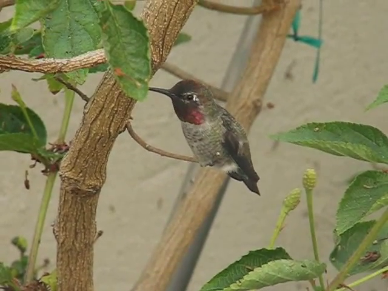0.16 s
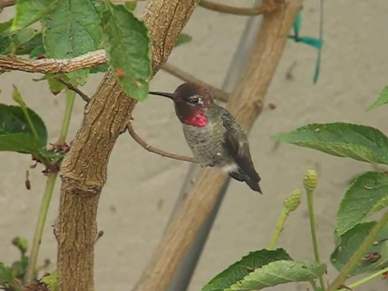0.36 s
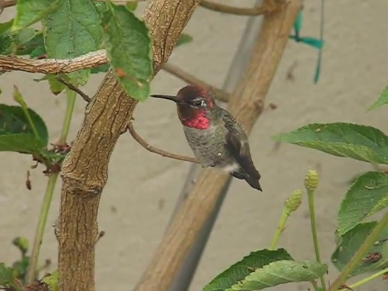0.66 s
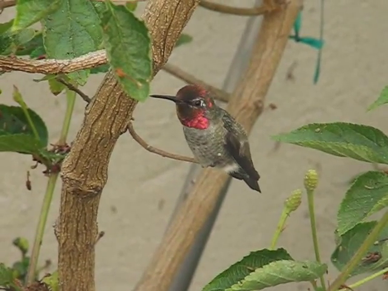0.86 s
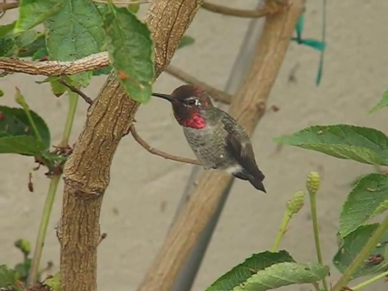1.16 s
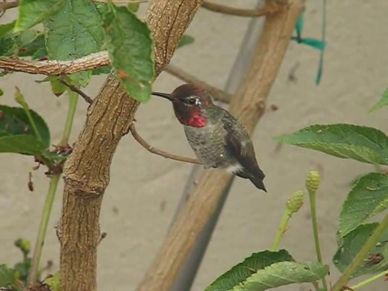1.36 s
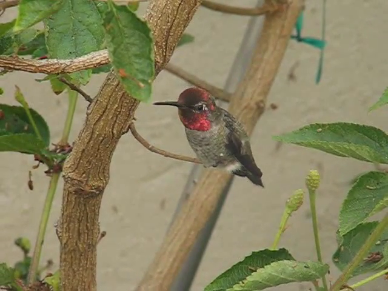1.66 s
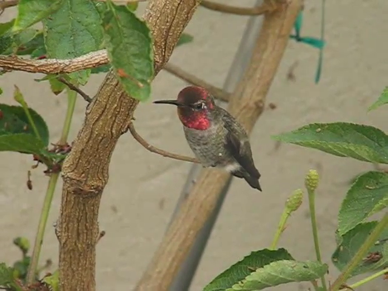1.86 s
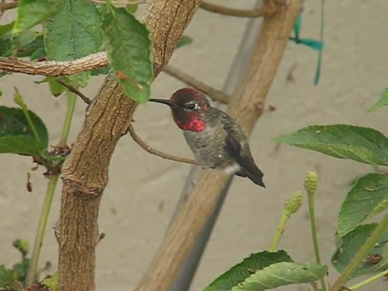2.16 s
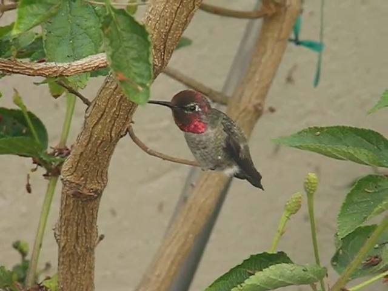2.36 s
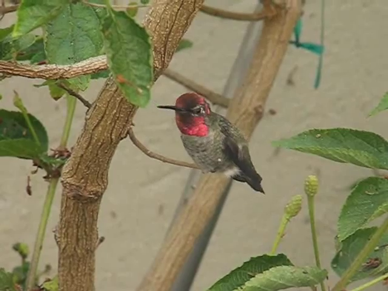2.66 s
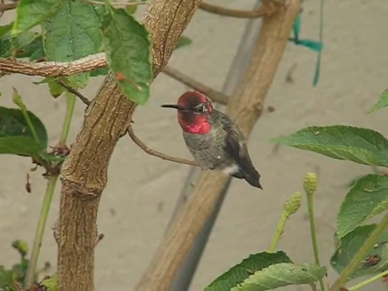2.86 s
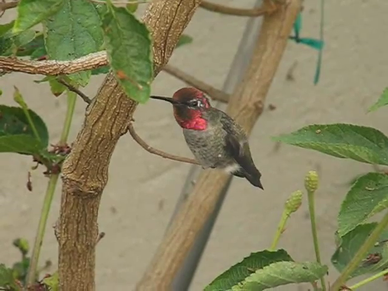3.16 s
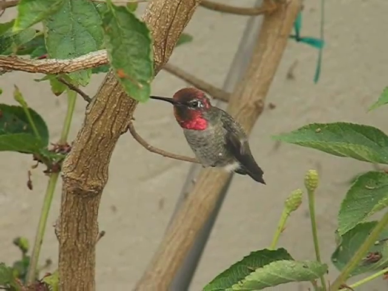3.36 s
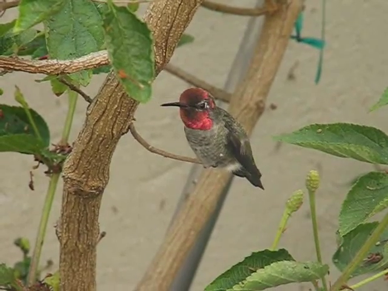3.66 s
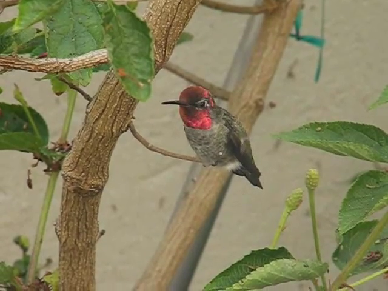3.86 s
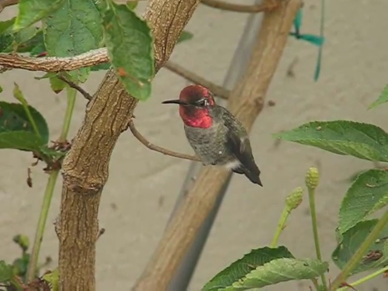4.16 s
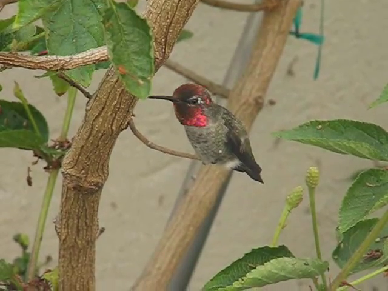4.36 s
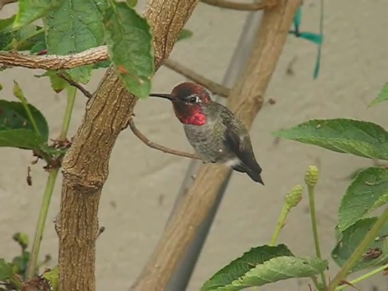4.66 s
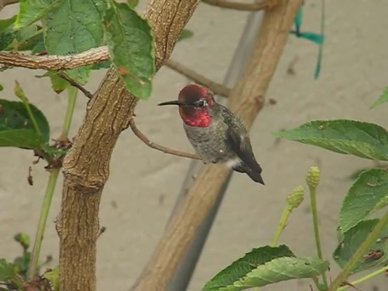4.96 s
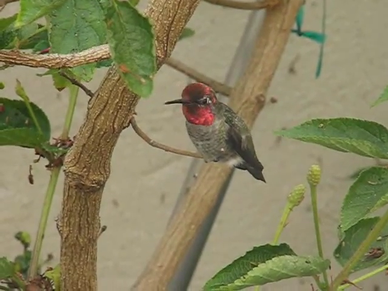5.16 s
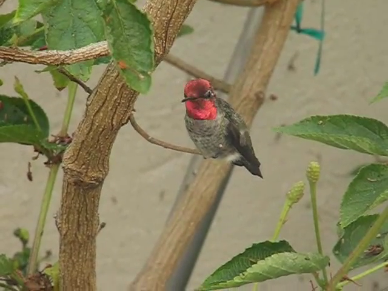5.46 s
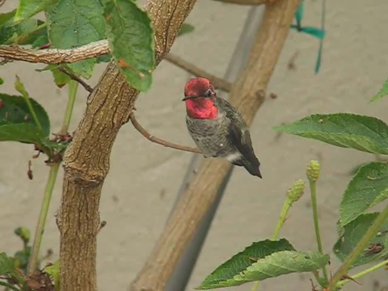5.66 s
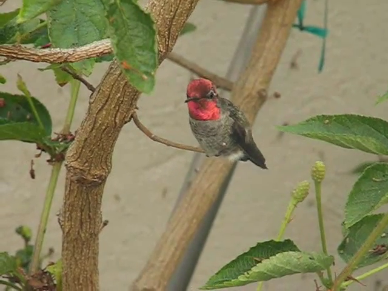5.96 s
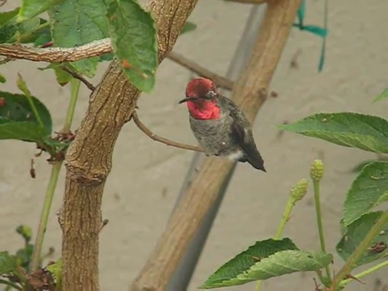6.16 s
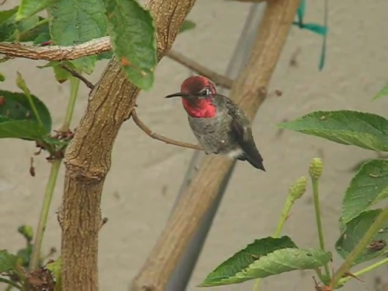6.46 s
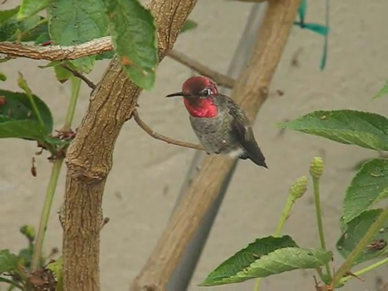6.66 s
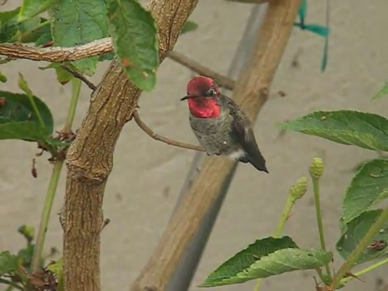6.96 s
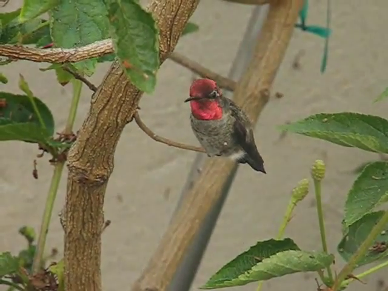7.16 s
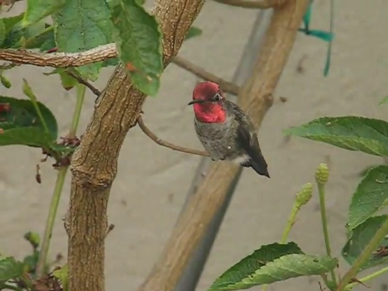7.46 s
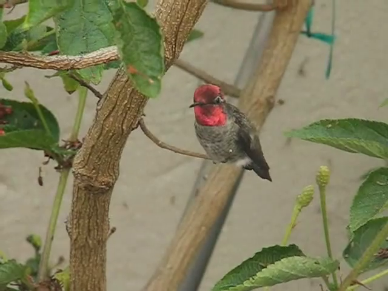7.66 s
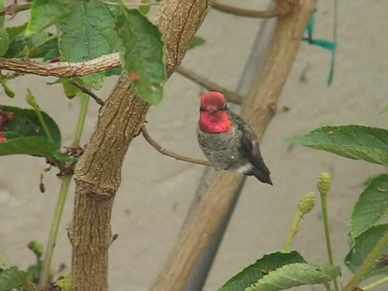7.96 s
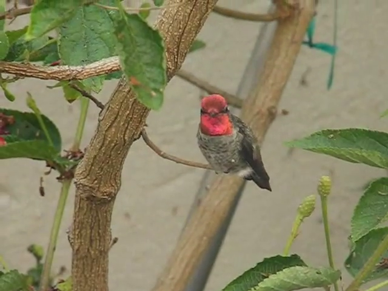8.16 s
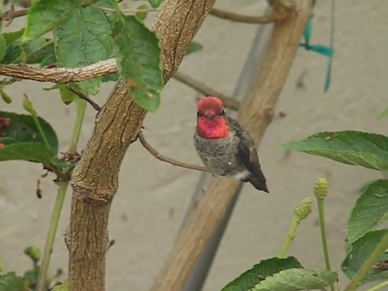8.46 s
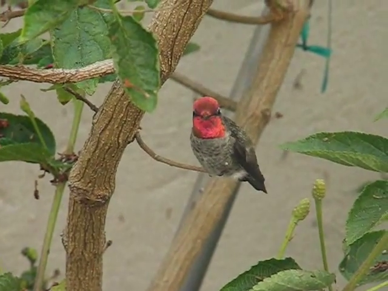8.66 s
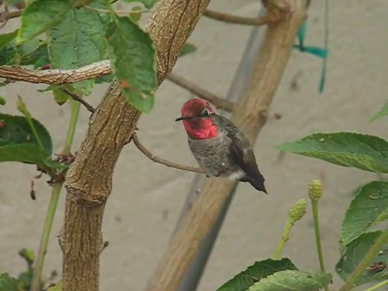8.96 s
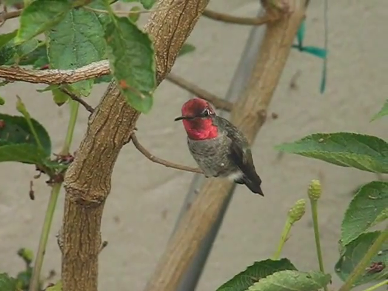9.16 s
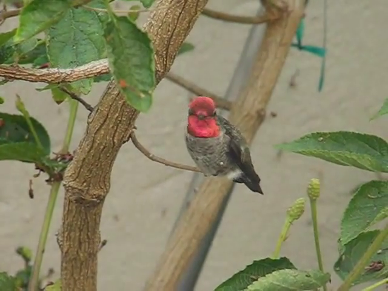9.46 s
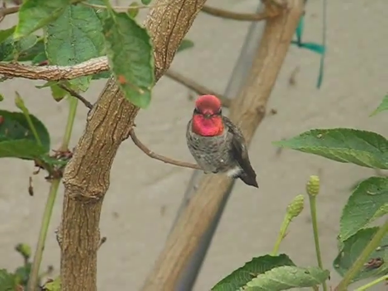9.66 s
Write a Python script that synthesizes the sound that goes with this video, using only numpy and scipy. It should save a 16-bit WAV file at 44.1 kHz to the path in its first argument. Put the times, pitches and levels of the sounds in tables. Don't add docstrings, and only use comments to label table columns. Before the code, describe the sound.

A hummingbird perched by a garden wall sings thin, very high, scratchy notes, buzzes and loud squeaks over a low distant traffic hum.

```python
import sys
import numpy as np
from scipy import signal
from scipy.fft import rfft, irfft, next_fast_len
from scipy.io import wavfile
from scipy.ndimage import uniform_filter1d, minimum_filter1d, map_coordinates

SR = 44100
rng = np.random.default_rng(int(sys.argv[2]) if len(sys.argv) > 2 else 0)


def inscribe(sig):
    pcm = np.round(np.clip(np.atleast_2d(sig).T, -1, 1) * 32767)
    wavfile.write(sys.argv[1], SR, pcm.astype(np.int16))


def magnitude_from_level(level_db):
    exponent = np.asarray(level_db, float) / 20
    return 10 ** exponent


N = 432180


def unit(x):
    return x / np.sqrt(np.mean(np.abs(x) ** 2) + 1e-20)


def along(points, hz):
    point_hz, value = np.transpose(points)
    return np.interp(np.log(hz + 1), np.log(point_hz + 1), value)


def wobble(rate, size):
    knots = rng.standard_normal(int(size * rate / SR) + 4)
    return map_coordinates(knots, [np.arange(size) * rate / SR])


def filtered(x, response):
    m = next_fast_len(N + SR // 2)
    return irfft(rfft(x, m) * response(np.fft.rfftfreq(m, 1 / SR)), m)[..., :N]


def add(track, s, hz, gain):
    part = track[round(s * SR):][:len(hz)]
    phase = 2 * np.pi * (np.cumsum(hz) / SR + rng.random())
    part += (gain * np.exp(1j * phase))[:len(part)]


def voiced(track, overtones_db):
    local_level = np.sqrt(np.abs(uniform_filter1d(np.abs(track) ** 2, 40)) + 1e-12)
    turn = track / local_level
    return sum(magnitude_from_level(db) * (track * turn ** k).real for k, db in enumerate(overtones_db))


RENDITIONS = {"open": [(3.756, .99, 1.005, .5, 2), (7.638, 1.01, .995, .5, -2)],
              "whistle": [(.343, .95, .99, -.5, .5), (4.064, 1.01, 1.005, .5, .5),
              (7.955, 1.002, 1.005, .5, -1.5)], "answer": [(.716, .97, 1.02, 1, .5),
              (4.455, 1.01, 1.01, -1.5, .5), (8.345, .99, .97, -.5, -.5)],
              "close": [(.040, 1.01, 1.01, -2.5, .5), (1.048, 1.01, .995, -.5, .5),
              (4.796, 1.005, .995, -.5, -1), (8.685, .99, 1.01, .5, .5)],
              "reed": [(1.675, 1.01, 1.005, -.5, -.5), (5.412, .98, 1.005, .5, -1),
              (9.318, 1.03, .98, .5, 1.5)], "bray": [(2.068, 1.005, .998, .2, 2),
              (5.824, .995, .995, -.5, -2), (9.712, .99, 1.01, 1, .5)],
              "duet": [(2.560, 1.015, 1.002, .2, .5), (6.352, 1.002, 1.002, .5, .5)],
              "encore": [(3.100, .99, .995, -1.5, -.5), (7.018, .997, .995, .5, .2)]}


def sung(table):
    once = (0, 1, 1, 0, 0)
    pairs = []
    for names, rows in table.items():
        for name in names.split():
            for time in RENDITIONS.get(name, [once]):
                pairs += [(row, time) for row in rows if time[0] + row[0] * time[1] >= 0]
    return pairs


def sung_notes(table):
    return [(s + after * pace, length * pace, from_hz * pitch, to_hz * pitch, db + note_db)
            for (after, length, from_hz, to_hz, db), (s, pace, pitch, note_db, _) in sung(table)]


def sung_buzzes(table):
    return [(s + after * pace, length * pace, mid_hz * pitch, start_db + buzz_db, end_db + buzz_db)
            for (after, length, mid_hz, start_db, end_db), (s, pace, pitch, _, buzz_db) in sung(table)]


def notes(rows, overtones_db, bend, waver, flutter_db, edge,
          arch=0., swell_db=0., throb=0., throb_hz=50, dive=0.):
    track = np.zeros(N, complex)
    for s, length, from_hz, to_hz, db in rows:
        size = round(length * SR)
        u = np.arange(size) / size
        cycle = np.cumsum(throb_hz * np.exp(0.058 * wobble(44.5, size))) / SR % 1
        settled = (1 - np.exp(-bend * u)) / (1 - np.exp(-bend))
        hz = from_hz + (to_hz - from_hz) * settled
        hz = hz * (1 + arch * np.sin(np.pi * u) + dive * np.exp(-7 * cycle))
        hz = hz * (1 + waver * (wobble(300, size) + 1.1 * wobble(1800, size)))
        beat = 1 - np.clip(throb, 0, 1) * np.cos(np.pi * cycle ** 0.5) ** 2
        shape = np.sin(np.pi / 2 * np.clip(np.minimum(u, 1 - u) / edge, 0, 1)) ** 2
        level_db = db + swell_db * (u - 1) + flutter_db * wobble(265.7, size)
        add(track, s, hz, magnitude_from_level(level_db) * shape * beat)
    return voiced(track, overtones_db)


def puffs(rows, overtones_db, rate_hz, uneven, span, waver, gate, rise):
    track = np.zeros(N, complex)
    for s, length, mid_hz, start_db, end_db in rows:
        size = round(length * SR)
        u = np.arange(size) / size
        cycle = np.cumsum(rate_hz * np.exp(uneven * wobble(rate_hz, size))) / SR % 1
        hz = mid_hz * np.exp(span * (.5 - cycle) + waver * wobble(1500, size))
        puff = np.sin(np.pi * cycle) ** gate * magnitude_from_level(2.8 * wobble(85.5, size))
        edge = np.clip(np.minimum(u * length / rise, (1 - u) * length / 0.016), 0, 1)
        add(track, s, hz, magnitude_from_level(start_db + (end_db - start_db) * u) * puff * edge)
    return voiced(track, overtones_db)


# start in seconds, length in seconds, from Hz, to Hz, level in dB.
WHISTLE_NOTES = [
    (.343, 0.042, 5274, 5610, -9.5),
    (.716, 0.045, 5250, 5530, -10),
    (4.064, 0.05, 5480, 5700, -11),
    (4.455, 0.038, 5270, 5380, -12.5),
    (7.955, 0.0364, 5150, 5610, -9),
    (8.345, 0.033, 5420, 5596, -9),
]
# level of the fundamental, then of each overtone, in dB.
WHISTLE_OVERTONES = [0, -8]


def whistles():
    return notes(WHISTLE_NOTES, WHISTLE_OVERTONES, bend=2.5, waver=.015, flutter_db=4, edge=.25,
                 arch=.04, swell_db=9)


GLIDE_NOTES = {"open": [(0, 0.0078, 5770, 7400, -24), (.004, 0.0098, 6600, 9400, -28),
               (.071, 0.017, 10700, 6250, -24.5), (.172, 0.0053, 11450, 10100, -28.5)],
               "whistle": [(.108, 0.0095, 7400, 9600, -33), (.117, 0.0051, 10900, 9900, -31)],
               "answer": [(.104, 0.0078, 7000, 9000, -41), (.112, 0.0033, 9700, 8950, -31.5)],
               "reed": [(-.148, .005, 5640, 3300, -43.5), (-.141, .004, 5200, 3830, -41)],
               "close": [(0, 0.0114, 6160, 7140, -24), (.004, 0.007, 6700, 8400, -28),
               (.072, 0.011, 8660, 6400, -23)], "free": [(.160, .008, 9600, 7800, -32),
               (.180, .007, 9800, 7750, -30), (.4595, .004, 7460, 5400, -30),
               (1.056, .012, 8200, 10500, -31.5), (1.170, .008, 10470, 7600, -27),
               (1.205, .0072, 10630, 8500, -25), (4.282, 0.0081, 11100, 6070, -23.5),
               (4.750, .0041, 10400, 9000, -25.5), (5.218, 0.0023, 11500, 10100, -24),
               (8.170, 0.0068, 10800, 5870, -28.5), (8.171, .004, 11000, 10200, -28),
               (3.751, .006, 7900, 7700, -24), (5.222, .006, 8450, 5700, -33),
               (5.688, .005, 5800, 3300, -37), (.550, .008, 9050, 5840, -31.5),
               (2.258, .006, 9500, 7700, -36), (1.749, .004, 5800, 4500, -36),
               (9.112, .004, 10500, 8450, -36)]}
# level of the fundamental, then of each overtone, in dB.
GLIDE_OVERTONES = [0, -4]


def glides():
    rows = sung_notes(GLIDE_NOTES)
    rising = [row for row in rows if row[2] < row[3]]
    falling = [row for row in rows if row[2] >= row[3]]
    up = notes(rising, GLIDE_OVERTONES, bend=1.2, waver=.009, flutter_db=1, edge=.03)
    return up + notes(falling, GLIDE_OVERTONES, bend=3, waver=.009, flutter_db=1, edge=.03)


TRILL_NOTES = {"open": [(.115, 0.095, 6540, 6860, -30.5), (.125, 0.089, 8140, 7800, -32.5)],
               "close": [(.100, 0.12, 6800, 6230, -31), (.117, 0.12, 8280, 7910, -30.5)],
               "reed": [(-.142, 0.064, 7520, 7800, -40), (-.024, 0.036, 7200, 7170, -36)]}
# level of the fundamental, then of each overtone, in dB.
TRILL_OVERTONES = [0, -3.5]


def trills():
    return notes(sung_notes(TRILL_NOTES), TRILL_OVERTONES, bend=.6, waver=.018, flutter_db=3, edge=.06,
                 throb=.9, throb_hz=56, dive=.06)


PURL_NOTES = {"duet": [(.309, .085, 4070, 3830, -43)], "free": [(2.255, .02, 4220, 4100, -38),
              (2.296, 0.049, 4280, 4530, -34.5), (2.334, .024, 4730, 4770, -25.5),
              (2.358, 0.11, 4540, 4270, -33.5), (6.01, 0.086, 4240, 4270, -34.5),
              (6.11, 0.12, 4430, 4467, -41.5)]}
# level of the fundamental, then of each overtone, in dB.
PURL_OVERTONES = [0, -6.5, -5]


def purls():
    return notes(sung_notes(PURL_NOTES), PURL_OVERTONES, bend=.6, waver=.015, flutter_db=4, edge=.03,
                 throb=.95, throb_hz=47, dive=.09)


DUET_NOTES = {"duet": [(0, 0.121, 4630, 4650, -37.5), (0, 0.12, 5050, 5420, -32.5),
              (.06, .06, 6000, 6050, -44)], "encore": [(0, 0.146, 4630, 4610, -37),
              (0, 0.11, 5050, 5430, -31.5), (.05, .06, 6050, 6150, -41)]}
# level of the fundamental, then of each overtone, in dB.
DUET_OVERTONES = [0, -3.5, -2]


def duets():
    return notes(sung_notes(DUET_NOTES), DUET_OVERTONES, bend=3.5, waver=.008, flutter_db=4.5, edge=.08,
                 arch=.015, swell_db=4, throb=.5, throb_hz=60)


SQUEAK_NOTES = {"bray": [(.004, .065, 9880, 9550, -31.5), (.168, 0.046, 9250, 9630, -26),
                (.168, .022, 9400, 10500, -22), (.192, 0.039, 10600, 10360, -26.5)]}


def squeaks():
    return notes(sung_notes(SQUEAK_NOTES), [0], bend=1.5, waver=.013, flutter_db=4, edge=.05, arch=.012)


# start in seconds, length in seconds, from Hz, to Hz, level in dB.
REED_NOTES = [
    (1.678, 0.087, 2070, 2177, -34.5),
    (5.412, 0.1, 1940, 2216, -37),
    (9.318, 0.087, 2067, 2145, -35.5),
]
# level of the fundamental, then of each overtone, in dB.
REED_OVERTONES = [-8, -17, -2.5, -12, -10.5, -6, -9.5]


def reeds():
    return notes(REED_NOTES, REED_OVERTONES, bend=3.2, waver=.014, flutter_db=4, edge=.06)


BRAY_NOTES = {"bray": [(0, 0.0703, 5950, 5865, -16.5), (.002, 0.0594, 3860, 3760, -28)]}
# level of the fundamental, then of each overtone, in dB.
BRAY_OVERTONES = [0, -9.5]


def brays():
    return notes(sung_notes(BRAY_NOTES), BRAY_OVERTONES, bend=3, waver=.02, flutter_db=3.5, edge=.18,
                 arch=.025, swell_db=6, throb=.35, throb_hz=300)


CHIP_NOTES = {"bray": [(.142, 0.015, 1800, 1740, -40.5)], "free": [(1.752, 0.023, 2300, 2500, -38.5),
              (5.39, 0.018, 2800, 2760, -42), (5.49, .025, 2300, 2400, -39),
              (4.875, 0.042, 1250, 1242, -35.5)]}


def chips():
    return notes(sung_notes(CHIP_NOTES), [0], bend=.6, waver=.03, flutter_db=2.5, edge=.3)


BUZZ_RUNS = {"open": [(-.087, 0.062, 6800, -42, -33), (.195, 0.13, 7360, -29, -33)],
             "whistle": [(-.008, 0.072, 6250, -28.5, -38), (.117, 0.018, 6300, -20, -27),
             (.266, .11, 6400, -29.5, -37.5)], "answer": [(-.01, 0.15, 6170, -27.5, -39),
             (.108, 0.023, 6300, -18, -34), (.183, .125, 6120, -36.5, -32)],
             "close": [(.112, .2, 6720, -38, -29)], "reed": [(-.213, 0.062, 6170, -39.5, -44),
             (-.1, 0.077, 5930, -32.5, -33.5), (-.035, .04, 5900, -36, -33)],
             "bray": [(-0.046, 0.048, 4700, -35, -27.5)], "duet encore": [(.123, 0.11, 6310, -29, -36)],
             "free": [(0, 0.062, 6840, -30, -46), (.515, 0.18, 6620, -32.5, -37),
             (1.45, 0.16, 6080, -35, -49), (1.870, 0.069, 6050, -38, -43), (1.968, 0.051, 4760, -36, -41),
             (5.585, .09, 6140, -55, -50), (9.49, 0.077, 6100, -44, -42), (6.243, 0.021, 5040, -30, -43.5)]}
# level of the fundamental, then of each overtone, in dB.
BUZZ_OVERTONES = [0, -4]


def buzzes():
    return puffs(sung_buzzes(BUZZ_RUNS), BUZZ_OVERTONES, rate_hz=340, uneven=.15, span=.62, waver=.07,
                 gate=1.1, rise=.006)


RASP_RUNS = {"bray": [(.007, 0.06, 5450, -40, -18.5), (.138, 0.031, 5400, -32.5, -35)],
             "reed": [(-.151, 0.028, 4000, -33.5, -48)], "duet encore": [(.222, .02, 5920, -20.5, -27),
             (.231, 0.065, 5610, -25.5, -17)], "free": [(1.60, 0.076, 3610, -37.5, -45),
             (3.672, .0354, 3620, -31, -45), (5.385, 0.024, 5470, -38, -36)]}
# level of the fundamental, then of each overtone, in dB.
RASP_OVERTONES = [0, -2.6, -1.9]
# frequency in Hz, gain in dB.
OPEN_THROAT = [(3700, -3), (5600, 1.5), (6900, 1.5), (8000, 6), (9000, 1.5), (10700, 4.5), (12400, -1),
               (14500, -5)]


def rasps():
    source = puffs(sung_buzzes(RASP_RUNS), RASP_OVERTONES, rate_hz=330, uneven=.4, span=.7, waver=.14,
                   gate=.4, rise=.001)
    return filtered(source, lambda hz: magnitude_from_level(along(OPEN_THROAT, hz)))


TICK_RUNS = {"open": [(-.150, -.150, -31, 3.5), (-.099, -.082, -32, 4), (-.047, -.038, -32.5, 8.5),
             (0, 0, -43, 1.5)], "whistle": [(.124, .124, -30, 6), (.187, .194, -29.5, 3),
             (.252, .252, -30, 2.5)], "answer": [(.119, .119, -36.5, 10)],
             "reed": [(-.186, -.158, -42, -5.5), (-.146, -.146, -38, -6)], "free": [(.8906, .918, -33, 7),
             (.9564, .9712, -37, 9), (1.0124, 1.0124, -37, 9), (1.767, 1.767, -36, 7),
             (1.9372, 1.9632, -36.5, 0), (4.6432, 4.6608, -33.5, 9.5), (4.698, 4.7254, -34, 8),
             (4.7602, 4.7602, -38, -3), (5.197, 5.197, -33, 0), (5.5144, 5.5144, -32, 4.5),
             (5.679, 5.7185, -34.5, 1), (5.7638, 5.8048, -32, -10), (2.339, 2.1, -47, -1),
             (8.1776, 8.1776, -36, -9), (8.542, 8.542, -42, 9.5), (8.5987, 8.608, -38, 11.5),
             (8.642, 8.65, -29.5, 8), (9.0854, 9.0932, -33, 2), (9.127, 9.157, -35, -7),
             (9.570, 10, -39, -1), (8.519, 8.533, -40, 2), (8.551, 8.551, -44, 4), (1.975, 1.993, -44, -4),
             (5.189, 5.189, -39, -4), (.584, 0.66, -35, 6), (9.408, 9.408, -30, 5.5),
             (9.592, 9.610, -38, -4), (9.632, 9.692, -40, -10)]}


def ticks():
    gap_s, scatter_db = .009, 0.5
    start_hz, log_fall, opens_per_db = 7800, 0.4254, 0.0227
    track, u = np.zeros(N + SR), np.arange(150) / 150
    each = []
    for (first, last, db, low_db), (s, pace, *_) in sung(TICK_RUNS):
        count = 1 + round(abs(last - first) / gap_s)
        each += [(at, db, low_db) for at in s + pace * np.linspace(first, last, count)]
    for (s, db, low_db), (pitch, phase, size) in zip(each, rng.standard_normal((len(each), 3))):
        opens = opens_per_db * max(low_db, -4)
        hz = start_hz * np.exp(.04 * pitch + opens - (log_fall + opens) * u)
        turn = 2 * np.pi * np.cumsum(hz) / SR + phase
        tick = np.sin(np.pi * u ** 1.05) * (np.cos(2 * turn) + magnitude_from_level(low_db - 2.5) * np.cos(turn))
        track[max(round(s * SR) - 55, 0):][:len(u)] += magnitude_from_level(db + 2.0 + scatter_db * size) * tick
    return track[:N]


def bird():
    tones = glides() + whistles() + trills() + purls() + duets() + squeaks() + reeds() + brays() + chips()
    return tones + buzzes() + rasps() + ticks()


# frequency in Hz, time to fall 60 dB in seconds.
YARD_DECAY = [(2200, 0.38), (5500, 0.3), (8000, 0.35), (11000, 0.29), (14000, 0.18)]
# delay in seconds, level in dB, left-right difference in dB.
WALL_ECHOES = [
    (.003, -7, 7),
    (.008, -11, -5.5),
    (0.016, -11, 6),
    (0.024, -22, 4),
]


def yard(x):
    hz, t, z = signal.stft(rng.standard_normal((2, SR * 3 // 4)), SR, nperseg=256)
    decay = magnitude_from_level(-60 * t / along(YARD_DECAY, hz)[:, None])
    shared, apart = signal.istft(z * decay, SR, nperseg=256)[1]
    tails = np.array([shared + .6 * apart, shared - .6 * apart]) / np.linalg.norm(shared)
    near = x
    for s, db, lean_db in WALL_ECHOES:
        echo = np.pad(x, (round(s * SR), 0))[:N]
        near = near + magnitude_from_level([[db + lean_db / 2], [db - lean_db / 2]]) * echo
    return near + magnitude_from_level(-4.5) * signal.fftconvolve(np.pad(x, (200, 0))[None], tails, axes=1)[:, :N]


# frequency in Hz, left-right difference in dB.
PORT_LEAN = [(1200, 12), (2200, -8.5), (3800, -2), (5500, 8.5), (7000, -1), (9000, -4), (12000, -1.5),
             (15000, -2)]
# frequency in Hz, radians by which the left leads.
PORT_LEAD = [(0, -0.17), (3620, -0.27), (5770, -1), (6720, -0.017), (15000, -0.1), (15200, -0.45)]


def at_ports(x):
    def ports(hz):
        return [magnitude_from_level(side * along(PORT_LEAN, hz) / 2) * np.exp(side * .5j * along(PORT_LEAD, hz))
                for side in (1, -1)]
    return filtered(x, ports)


# frequency in Hz, left-right likeness (0 to 1).
LIKENESS = [(60, 0.99), (180, 0.97), (550, 1), (1650, 0.77), (4970, 0.54), (15000, 1)]


def hum(spectrum, patchy_db):
    z = signal.stft(rng.standard_normal((2, N)), nperseg=512)[2]
    field = uniform_filter1d(uniform_filter1d(rng.standard_normal(z.shape[1:]), 6, 0), 14, 1)
    pair = signal.istft(z * magnitude_from_level(patchy_db * unit(field)), nperseg=512)[1][:, :N]

    def mid_side(hz):
        turn = np.arccos(np.clip(along(LIKENESS, hz), -1, 1)) / 2
        return magnitude_from_level(along(spectrum, hz)) * [np.cos(turn), np.sin(turn)]
    mid, side = filtered(pair, mid_side)
    return unit(np.array([mid + side, mid - side]))


# time in seconds, rumble level in dB.
TRAFFIC_SWELL = [(0, -29.5), (.35, -33.5), (.6, -36.5), (0.899, -31), (1.25, -29), (1.45, -36), (1.8, -38),
                 (2.0, -30.5), (2.3, -38), (5.5, -37.5), (8.4, -36), (8.6, -36), (9.2, -37.5), (9.8, -34)]
# frequency in Hz, level in dB per Hz.
RUMBLE_SPECTRUM = [(8.8, -35), (15, 13), (49, 4), (76, 9), (130, 3.5), (170, -39), (290, -120)]


def traffic():
    swell_db = np.interp(np.arange(N) / SR, *np.transpose(TRAFFIC_SWELL))
    strength = magnitude_from_level(-5.5 + 1.6 * wobble(1.76, N))
    engine = strength * np.sin(2 * np.pi * 74 * np.cumsum(1 + 0.0304 * wobble(3, N)) / SR)
    return magnitude_from_level(swell_db) * (hum(RUMBLE_SPECTRUM, patchy_db=1.4) + engine)


# frequency in Hz, width in Hz, level in dB.
MACHINE_TONES = [(185, 26, -42.5), (335.4, 2.9, -46.5), (359.3, 10.8, -46.5), (487.7, 18, -49.5)]


def machinery():
    drone = 0
    for hz, width, db in MACHINE_TONES:
        noise = rng.standard_normal(N)
        drone = drone + magnitude_from_level(db) * unit(filtered(noise, lambda f: 1 / (1 + (2 * (f - hz) / width) ** 2)))
    return drone


# frequency in Hz, level in dB per Hz.
TOWN_SPECTRUM = [(60, -27), (95, -0.5), (170, -2), (300, -4.5), (424, -10), (712, -11), (1000, -20),
                 (1550, -22), (2400, -26), (3600, -29.5), (5500, -23), (8000, -33), (12600, -34),
                 (13600, -48)]


def town():
    steady = magnitude_from_level(-32.5) * hum(TOWN_SPECTRUM, patchy_db=0.8)
    return (steady + machinery() + traffic()) * magnitude_from_level([[.55], [-.55]])


def scene():
    return at_ports(yard(bird())) + town()


def top_cut(x):
    return signal.sosfilt(signal.butter(12, 15710, fs=SR, output="sos"), x)


# frequency in Hz, gain in dB.
MICROPHONE_RESPONSE = [(13000, 0), (14500, -2), (14900, -11), (15150, -34), (16000, -62)]


def record(dry):
    heard = filtered(dry, lambda hz: magnitude_from_level(along(MICROPHONE_RESPONSE, hz)))
    loudest = -minimum_filter1d(-np.abs(heard).max(axis=0), size=2600, origin=900)
    heard = heard * uniform_filter1d(np.minimum(1, .72 / loudest), size=900)
    heard = heard / (1 + np.abs(heard / .95) ** 4) ** .25
    return top_cut(heard)


dry = scene()
out = record(dry)
inscribe(out)
```